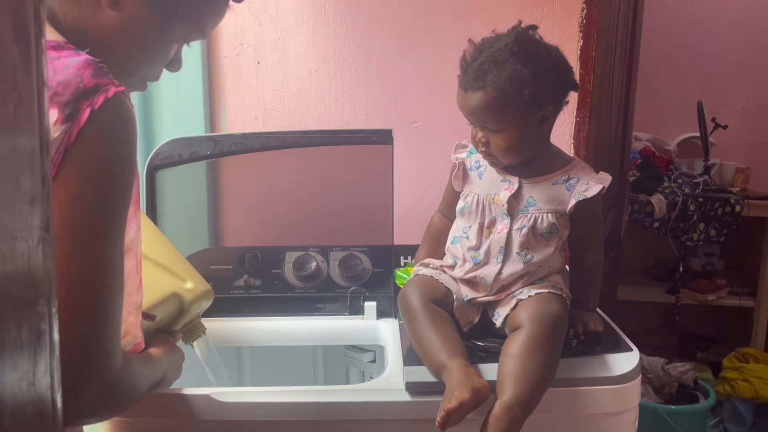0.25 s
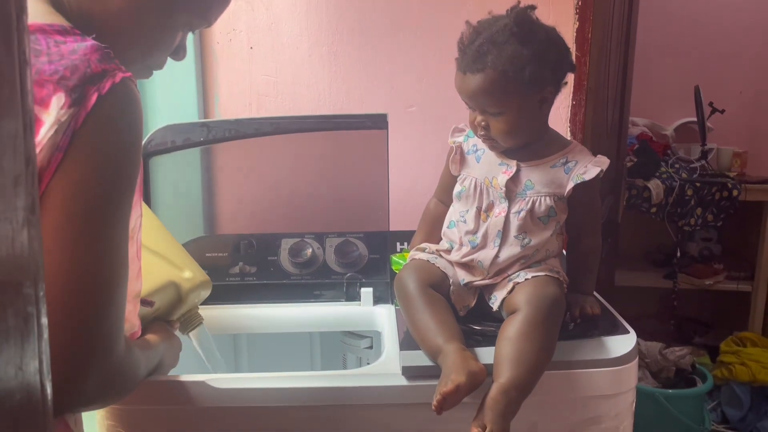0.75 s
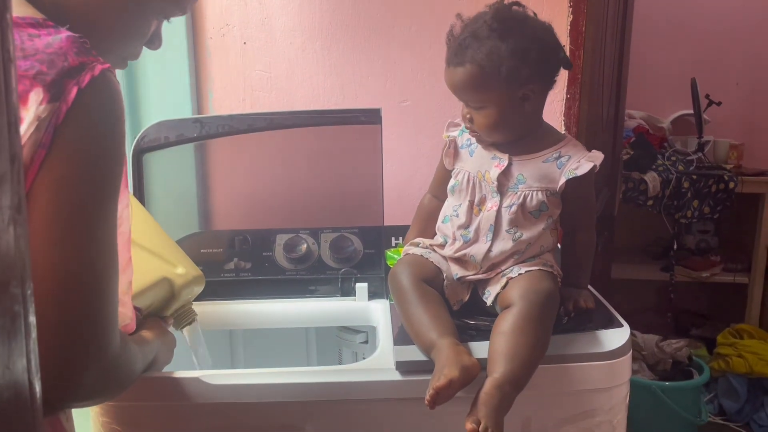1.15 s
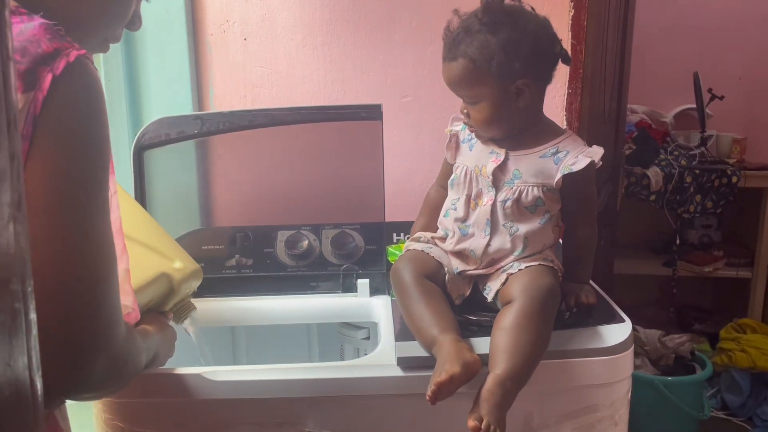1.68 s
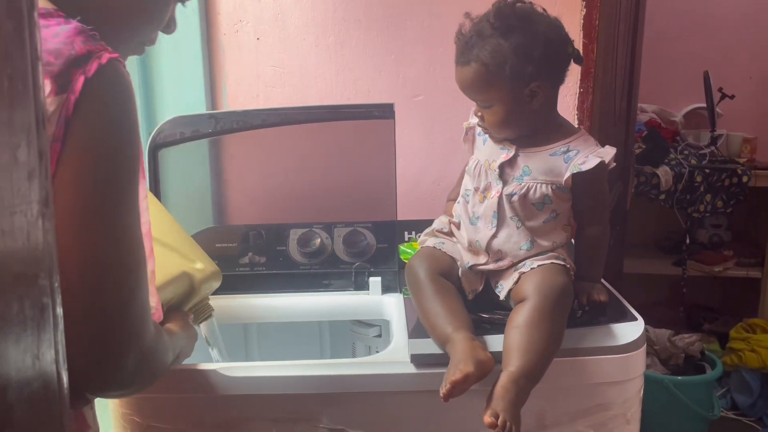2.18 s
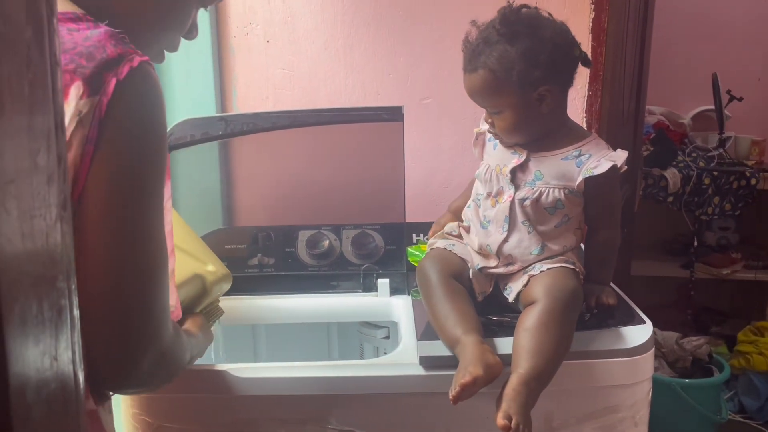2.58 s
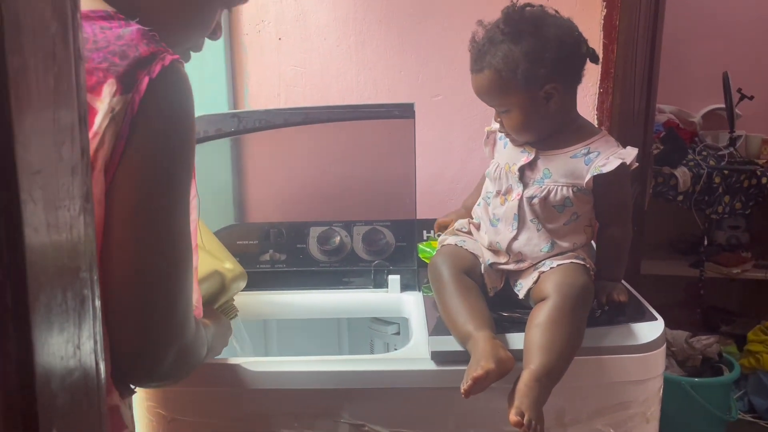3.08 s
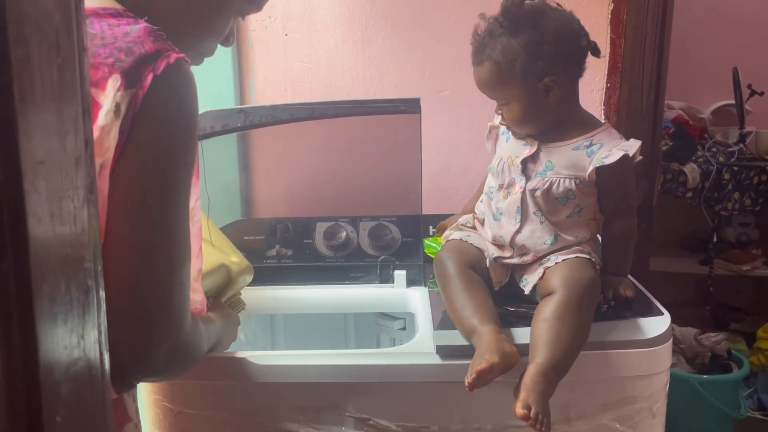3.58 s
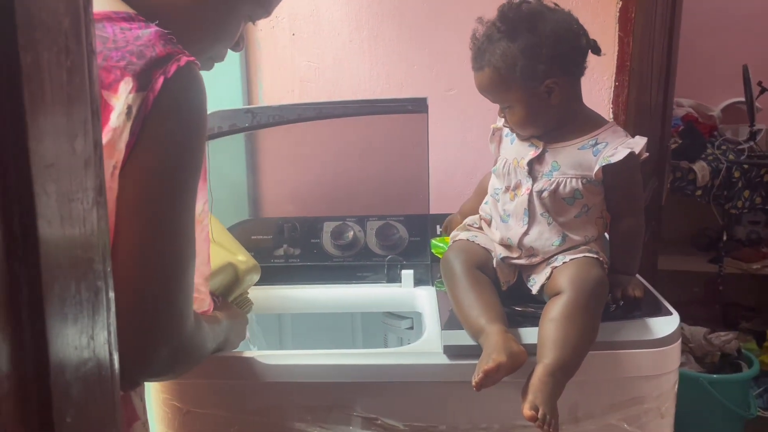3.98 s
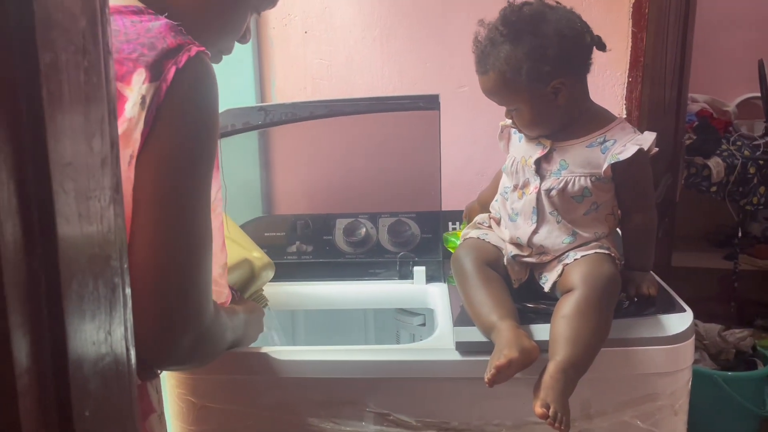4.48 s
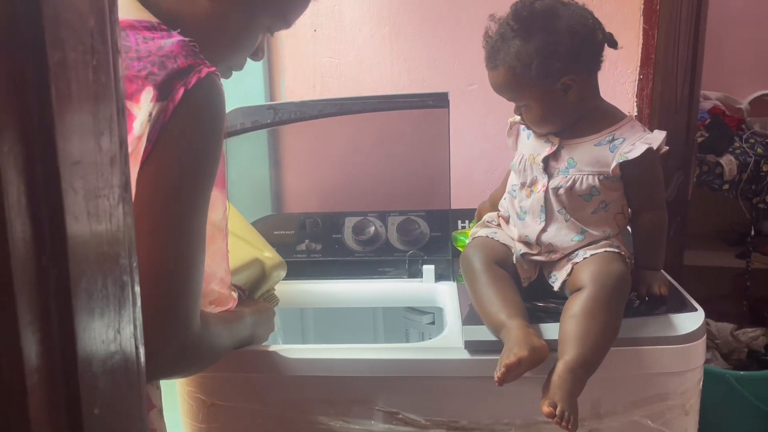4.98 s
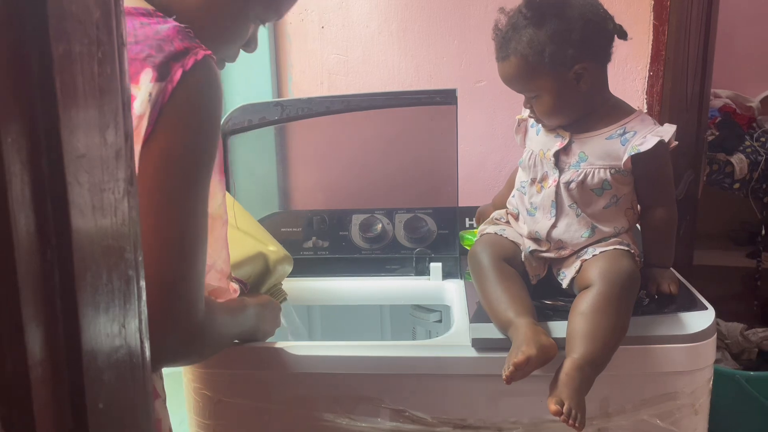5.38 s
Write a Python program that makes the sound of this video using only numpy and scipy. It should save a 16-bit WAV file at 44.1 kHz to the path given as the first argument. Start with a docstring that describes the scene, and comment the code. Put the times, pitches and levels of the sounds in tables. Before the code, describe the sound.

An uneven stream of water falls into a hollow plastic tub, heard from a step away by two close microphone ports. Hissing spray and ringing bubbles ride over low, boomy tub resonance. It begins gurgling, slaps brightly, thumps the wall, then surges and gulps irregularly, with late deep knocks and a final rising splash. The room's tail is short and dense.

```python
"""Small room, a step from a washing machine: water glugs from a plastic can into its deep plastic tub.
Low gurgles open the sound, then bright slaps near 0.4 s; a wall thump follows at 0.6 s, gulps at 1 s.
Surges crowd again at 1.6-1.95 s; a strong gulp knocks at 2.6 s, and from 2.9 s surges come often.
Gulps knock again just after 5 s, a last surge lands at 5.4 s, and the splash swells to the end.
Noise bands make the spray, ringing pockets the bubbles, resonators the tub; two close ports hear it."""
import sys
import numpy as np
from scipy import signal
from scipy.fft import rfft, irfft, next_fast_len
from scipy.io import wavfile
from scipy.ndimage import uniform_filter1d

SR = 44100
rng = np.random.default_rng(int(sys.argv[2]) if len(sys.argv) > 2 else 0)


def transcribe(signal):
    """Save signal, clipped to [-1, 1], as a 16-bit WAV file at the path in sys.argv[1]."""
    frames = np.atleast_2d(signal).T
    limited = np.clip(frames, -1, 1)
    pcm = np.round(limited * 32767).astype(np.int16)
    wavfile.write(sys.argv[1], SR, pcm)


N = 248724

# surges landing on the pool:
# t/s, level/dB, rise/s, t60/s, centre f/Hz, fall either side/(dB per octave)
SURGES = [(0.06, -6, 0.022, 0.68, 1080, 5), (0.19, -10, .02, 0.32, 560, 21),
          (0.269, -13.5, 0.0024, 0.062, 2490, -2.5), (0.3, -1, 0.02, 0.12, 7000, 11),
          (0.385, -6.5, 0.0094, 0.24, 11000, 0.5), (0.42, -4, 0.0043, 0.47, 3050, 9.5),
          (0.435, -4.5, 0.0023, 0.28, 1400, 9), (0.61, -14, 0.011, 1, 6000, 17),
          (0.849, -3.5, 0.0025, 0.22, 3000, 2.5), (0.902, -5, .002, 0.4, 2160, 8),
          (1.597, -6, 0.012, 0.36, 3000, 10), (1.617, -13, .004, 0.22, 2280, 20),
          (1.68, -4.5, 0.041, 0.52, 1220, 8.5), (1.745, -0.5, 0.012, 0.25, 570, 16),
          (1.83, -2.5, .01, 0.21, 800, 17), (1.868, -10.5, .001, 0.21, 4750, 18),
          (1.921, -14, .002, 0.37, 12100, 3), (1.947, -4.5, 0.00085, 0.48, 2520, 2.5),
          (2.12, -12.5, 0.045, 0.87, 4000, 3), (2.609, -3.5, 0.0051, 0.15, 2000, 3.5),
          (2.66, -17, 0.015, 0.83, 2200, 0.5), (2.925, -10, 0.0011, 0.45, 1510, 0),
          (2.94, -8, 0.015, 0.77, 1200, 19), (2.942, -7, .003, 1, 2800, 8),
          (3.135, -15.5, 0.016, 0.51, 2500, 0), (3.288, -8.5, 0.037, 0.25, 2300, -1),
          (3.3, -21, 0.033, .4, 10000, 1), (3.443, -2, 0.0007, 0.06, 11500, 7),
          (3.452, -14, 0.013, 0.54, 8000, 3), (3.455, -12.5, .01, 0.87, 1790, 9),
          (3.673, -1, 0.0007, 0.049, 950, 17), (3.726, -4.5, .001, 0.2, 5200, 6.5),
          (3.795, -6, 0.0055, 0.62, 2600, 3), (3.92, -6, 0.017, 0.31, 3540, 3),
          (4.09, -13, 0.0047, 1, 5970, 5), (4.2, -12, 0.011, 0.1, 2500, 3),
          (4.32, -15, 0.0088, 0.42, 9800, 4), (4.525, -17, 0.013, .4, 6000, -2.5),
          (4.549, -7, .002, 0.67, 2490, 4), (4.88, -4, 0.0027, 0.1, 4520, 11),
          (4.943, -0.5, .001, 0.12, 6160, 14), (5.017, -5.5, 0.0022, 0.12, 1750, 6),
          (5.041, -9, 0.0028, 0.55, 3020, 5), (5.129, -11.5, 0.002, 0.21, 1500, 5.5),
          (5.163, -10, .008, 0.26, 1500, 11), (5.35, -10.5, 0.021, 0.51, 8000, 0),
          (5.405, -2, 0.0068, 0.6, 2510, 16)]


def slaps(hz):
    """Envelope of the surges in one band: each rises as it lands, then its spray settles."""
    out = np.zeros((1, N))
    for s, level_db, rise_s, t60, centre_hz, fall_db in SURGES:
        t = np.arange(round(t60 * SR)) / SR
        band_db = level_db - fall_db * abs(np.log2(hz / centre_hz))
        rise = 1 - np.exp(-t / rise_s)
        add(out, s, amp(band_db - 60 * t / t60) * rise)
    return out[0]


# the stream between surges: t/s, then relative level/dB of gurgle, splash, spray, fine mist
STREAM_LEVELS = [(0.0, -33, -26.5, -27.5, -32), (0.24, -34, -33, -29.5, -30.5),
                 (0.33, -41, -26.5, -26, -31), (0.44, -36.5, -34.5, -31.5, -32.5),
                 (0.83, -26, -25.5, -23, -26.5), (1.05, -28.5, -24.5, -27, -27),
                 (1.24, -30.5, -26, -25.5, -27), (1.33, -38, -28.5, -29.5, -31.5),
                 (1.46, -35, -31, -30.5, -33), (1.58, -31.5, -37, -28, -31), (1.71, -31, -43, -33, -38.5),
                 (1.93, -37.5, -34, -38, -34), (2.12, -26.5, -29, -26.5, -26.5),
                 (2.5, -35.5, -30, -31, -31.5), (2.78, -29, -39, -34, -40.5), (2.97, -33, -44, -35.5, -35),
                 (3.12, -27, -30.5, -30.5, -32.5), (3.36, -32, -29, -29, -32), (3.53, -32, -35, -35, -41),
                 (3.75, -28, -39, -32.5, -31.5), (4.0, -33, -30, -30, -30.5),
                 (4.19, -30, -25, -29.5, -32.5), (4.3, -31.5, -33.5, -35.5, -35),
                 (4.42, -32, -32, -33, -37), (4.51, -34, -39, -36, -37), (4.59, -32, -22, -23, -29),
                 (4.74, -32, -31, -29, -32), (4.98, -33.5, -26.5, -26, -30.5),
                 (5.17, -30.5, -47, -37.5, -32.5), (5.3, -38.5, -34, -34, -34.5),
                 (5.42, -30.5, -26, -18, -26), (5.55, -25, -23, -24, -29), (5.64, -24, -15.5, -25, -25.5)]
HOLD_S = 0.0057  # the stream's level may not rise just before a surge lands


def stream_between_surges():
    """Register levels of the stream; they may not rise just before a surge, so that it starts abruptly."""
    out = np.array(in_time(STREAM_LEVELS))
    for s, *_ in SURGES:
        hold = slice(round((s - HOLD_S) * SR), round(s * SR))
        out[:, hold] = np.minimum.accumulate(out[:, hold], axis=1)
    return out


# spectrum of the water noise: f/Hz, relative level/dB
WATER_SPECTRUM = [(420, -2), (600, -8), (800, 0), (1500, -1.5), (2000, -2.5), (2800, -1.5), (4500, -5),
                  (7000, -3.5), (9000, -6.5), (11500, -3), (14000, -9), (16000, -17.5)]
# registers gurgle, splash, spray, mist, one a row: low f/Hz, high f/Hz
WATER_REGISTERS = [(480, 1400), (1400, 4000), (4000, 7500), (9800, 15700)]


def spray(register_db, patchy_db):
    """Droplet hiss in third-octave noise bands; each band follows the registers next to it."""
    edges = 420 * 2 ** np.arange(0, 5.4, 1 / 3)
    centres = np.sqrt(edges[1:] * edges[:-1])
    log_middles = np.log(np.prod(WATER_REGISTERS, axis=1)) / 2
    # level of each register relative to its share of the water spectrum
    power = [np.sum(amp(2 * at_hz(WATER_SPECTRUM, np.arange(low, high)))) * 2 / SR
             for low, high in WATER_REGISTERS]
    lift_db = np.array(register_db) - 10 * np.log10(power)[:, None]
    white = rng.standard_normal((2, 2, N))  # neighbouring bands take turns at two noises
    together = drift(3.0)
    patches = [drift(21.4) for _ in range(6)]  # one for every three bands
    out = 0
    for k, hz in enumerate(centres):
        band = signal.butter(2, edges[k:k + 2], "band", fs=SR, output="sos")
        weights = [np.interp(np.log(hz), log_middles, row) for row in np.eye(len(log_middles))]
        level = np.hypot(amp(weights @ lift_db), slaps(hz))
        patch_db = patchy_db * (together / 5 + patches[k // 3])
        gain = amp(at_hz(WATER_SPECTRUM, hz) + patch_db) * level
        out = out + gain * signal.sosfilt(band, white[k % 2])
    return out


def bubbles(register_db, surge_db, per_s, cycles, spread_db):
    """Small bubbles born at random ring for tens of cycles, louder in surges, each in its own direction."""
    sizes = amp(spread_db * np.minimum(rng.exponential(1, N), 3)) * rng.standard_normal((2, N))
    born = rng.random(N) < per_s / SR
    dealt = rng.integers(0, 36, N)  # which of 36 pitches each bubble takes
    pitches = np.geomspace(600, 6000, 36) * amp(rng.normal(0, 0.19, 36))
    register_tops = [high for low, high in WATER_REGISTERS]
    out = 0
    for k, hz in enumerate(pitches):
        clicks = sizes * (born & (dealt == k)) + 1e-18
        softened = resonance(clicks, hz, 8.8 * hz / cycles)
        rings = resonance(softened, hz, 2.0 * hz / cycles)
        stream_db = register_db[np.searchsorted(register_tops, hz)]
        level = np.hypot(amp(stream_db), amp(surge_db) * slaps(hz))
        out = out + level * rms_one(rings)
    return out / np.sqrt(12)


# cross modes of the tub: f/Hz, width/Hz, level/dB in the first view, level/dB in the second
CROSS_MODES = [(480, 58, -38, -22), (774, 32, -9, -5), (964, 31, -5, -22), (1240, 77, -7.5, -1),
               (1410, 71, -18, 6), (1850, 49, -3, 11), (2000, 165, -6, -15), (2220, 31, 0, -26),
               (2800, 110, -10, 9.5), (3600, 330, -12, -3), (5114, 67, -4, -15)]


def tub_colour(x):
    """The splash plus its ringing in the cross modes of the tub."""
    out = x
    for hz, width_hz, *levels_db in CROSS_MODES:
        out = out + amp(levels_db)[:, None] * resonance(x, hz, width_hz)
    return out


# single loud bubbles: t/s, level/dB, f/Hz at the start, t60/s
LOUD_BUBBLES = [(0.066, -19, 1900, 0.046), (0.068, -28, 930, 0.046), (0.09, -21, 1780, 0.054),
                (0.118, -20, 2220, 0.14), (0.146, -17.5, 1020, 0.19), (0.196, -19, 942, 0.041),
                (0.197, -22, 670, 0.045), (0.222, -24, 880, 0.045), (0.243, -27, 620, 0.04),
                (0.262, -26, 542, 0.12), (0.272, -25, 1920, 0.05), (0.379, -18, 1900, 0.042),
                (0.419, -15, 3710, 0.083), (0.42, -17, 3930, 0.043), (0.424, -17, 2430, 0.09),
                (0.424, -14, 2800, 0.045), (0.433, -7.5, 2000, 0.033), (0.435, -19, 3220, 0.034),
                (0.442, -13, 1990, 0.074), (0.448, -19, 1510, 0.028), (0.456, -19, 1240, 0.046),
                (0.52, -22, 2080, 0.034), (0.612, -22, 803, 0.045), (0.731, -17.5, 1250, 0.04),
                (0.816, -21, 2100, 0.069), (0.85, -19, 2380, 0.13), (0.854, -16, 750, 0.13),
                (0.855, -16, 2000, 0.17), (0.902, -5.5, 2160, 0.024), (0.931, -14, 750, 0.034),
                (1.029, -19, 1320, 0.044), (1.26, -23, 2100, 0.063), (1.442, -19.5, 2330, 0.043),
                (1.605, -22, 2990, 0.063), (1.619, -17, 2250, 0.082), (1.678, -24, 1490, 0.04),
                (1.696, -26, 1530, 0.054), (1.702, -28.5, 2740, 0.046), (1.712, -26, 2800, 0.035),
                (1.714, -22, 1300, 0.03), (1.736, -26, 1280, 0.04), (1.741, -18.5, 963, 0.05),
                (1.78, -30, 780, 0.033), (1.789, -25, 547, 0.041), (1.839, -28, 830, 0.025),
                (1.849, -27, 1180, 0.04), (1.947, -15, 2060, 0.028), (1.951, -17, 3830, 0.04),
                (1.952, -16, 1246, 0.088), (1.954, -26, 2150, 0.098), (1.976, -20, 2240, 0.046),
                (2.181, -22, 1880, 0.067), (2.292, -23, 3330, 0.029), (2.51, -21, 2220, 0.041),
                (2.617, -14.5, 750, 0.061), (2.616, -21, 3570, 0.057), (2.668, -23, 2180, 0.058),
                (2.791, -29, 713, 0.085), (2.926, -15, 840, 0.023), (2.938, -16.5, 1060, 0.05),
                (2.941, -13, 2530, 0.045), (2.943, -13, 3200, 0.03), (2.944, -23, 2320, 0.1),
                (2.948, -19, 2850, 0.069), (2.974, -14, 1900, 0.04), (2.984, -14, 1800, 0.05),
                (2.991, -14, 1850, 0.032), (2.997, -15, 1425, 0.06), (3.008, -19, 1890, 0.051),
                (3.227, -23, 907, 0.14), (3.32, -27, 2320, 0.065), (3.341, -21, 2310, 0.1),
                (3.38, -20, 2300, 0.057), (3.46, -24, 3020, 0.064), (3.474, -23, 1060, 0.092),
                (3.475, -20, 2000, 0.03), (3.543, -21, 1330, 0.043), (3.556, -21, 1760, 0.036),
                (3.628, -24, 750, 0.069), (3.674, -21, 910, 0.019), (3.731, -24, 2050, 0.031),
                (3.789, -17, 1890, 0.064), (3.809, -10.5, 2000, 0.069), (3.813, -22, 2800, 0.03),
                (3.815, -19, 3600, 0.024), (3.824, -16, 1740, 0.11), (3.859, -24, 950, 0.09),
                (3.934, -16, 1235, 0.04), (3.942, -20, 1380, 0.03), (3.946, -19, 2050, 0.03),
                (3.96, -15, 2290, 0.048), (4.022, -30, 1200, 0.045), (4.076, -28, 812, 0.16),
                (4.097, -20.5, 3010, 0.032), (4.155, -22, 768, 0.19), (4.202, -23, 3470, 0.034),
                (4.227, -19, 2800, 0.038), (4.298, -29, 1260, 0.034), (4.321, -25, 1090, 0.033),
                (4.361, -23, 2000, 0.044), (4.494, -27, 990, 0.04), (4.551, -12.5, 2010, 0.06),
                (4.553, -18, 1784, 0.069), (4.556, -20, 950, 0.04), (4.575, -21, 1090, 0.035),
                (4.559, -20, 3420, 0.034), (4.571, -14, 2620, 0.053), (4.577, -18, 2200, 0.09),
                (4.619, -20, 2620, 0.1), (4.622, -16, 2300, 0.057), (4.73, -19, 1940, 0.031),
                (4.791, -23, 3520, 0.025), (4.834, -25, 1930, 0.063), (4.906, -10.5, 2090, 0.052),
                (4.93, -27, 2160, 0.078), (5.018, -16, 1600, 0.04), (5.019, -14, 1860, 0.038),
                (5.046, -20, 750, 0.075), (5.054, -26, 2670, 0.057), (5.129, -16, 890, 0.029),
                (5.129, -17.5, 1740, 0.04), (5.145, -27, 1800, 0.04), (5.168, -19, 950, 0.03),
                (5.177, -24, 1100, 0.04), (5.174, -19, 1690, 0.038), (5.185, -27, 1210, 0.04),
                (5.224, -23, 1050, 0.075), (5.406, -18, 2380, 0.084), (5.414, -18, 2290, 0.097),
                (5.418, -10, 1330, 0.022), (5.42, -14, 1815, 0.088)]
# lesser bubbles at random: mean rate, top level and range below it, lowest and highest pitch, decay
LESSER_PER_S, LESSER_DB, LESSER_RANGE_DB = 20, -31.5, 7.5
LESSER_LOW_HZ, LESSER_HIGH_HZ, LESSER_T60_S = 750, 3570, 0.042
# a partner of each loud bubble: longest wait, level against it, widest share of pitch apart
PARTNER_S, PARTNER_DB, PARTNER_APART = 0.012, -8, 0.16


def plops():
    """Trapped air rings: loud bubbles, a partner shed by each, and a random scatter of lesser ones."""
    wait, size, pitch = rng.random((200, 3)).T
    lesser_s = np.cumsum(-np.log(wait)) / LESSER_PER_S
    lesser_db = LESSER_DB - LESSER_RANGE_DB * size
    lesser_hz = LESSER_LOW_HZ * (LESSER_HIGH_HZ / LESSER_LOW_HZ) ** pitch
    lesser = zip(lesser_s, lesser_db, lesser_hz, np.full(len(wait), LESSER_T60_S))
    late, apart = rng.random((len(LOUD_BUBBLES), 2)).T
    partners = [(s + PARTNER_S * a, level_db + PARTNER_DB, hz * (1 + PARTNER_APART * (2 * b - 1)), t60)
                for (s, level_db, hz, t60), a, b in zip(LOUD_BUBBLES, late, apart)]
    events = [row for row in [*LOUD_BUBBLES, *partners, *lesser] if row[0] < N / SR]
    return rung(events, rise=0.036, attack_s=0.00097, wobble=0.043)


# air gulped under the surface: t/s, level/dB, f/Hz at the start, t60/s (held within 0.01-0.5 s)
AIR_GULPS = [(0.075, -16.5, 331, 0.1), (0.88, -18.5, 358, 0.22), (1.001, -25, 281, 0.18),
             (1.024, -9, 298, 0.027), (1.098, -9.5, 320, 0.04), (1.591, -16.5, 337, 0.39),
             (2.09, -16.5, 392, 0.25), (2.263, -22, 361, 0.092), (2.618, -4, 321, 0.065),
             (2.932, -14.5, 346, 0.067), (3.14, -11, 304, 0.18), (3.19, -14, 340, 0.11),
             (3.242, -10, 317, 0.064), (3.456, -14, 313, 0.31), (3.809, -18, 318, 0.027),
             (3.74, -17, 320, 0.11), (4.215, -17, 327, 0.1), (4.33, -21, 326, 0.049),
             (4.439, -12, 317, 0.0094), (4.739, -16, 305.6, 0.19), (5.049, -5, 310, 0.1),
             (5.097, -9, 331, 0.089), (5.177, -19, 340, .06), (5.456, -18, 346, 0.073)]


def gulps():
    """Air gulped under the surface knocks the air space of the tub."""
    return rung(AIR_GULPS, rise=0.028, attack_s=0.0032, wobble=0.058)


# lumps of water on the walls: t/s, level/dB, f/Hz at the start, t60/s (held within 0.01-0.5 s)
WALL_THUMPS = [(0.416, -17, 150, 0.17), (0.581, -7.5, 105, 0.2), (0.63, -10.5, 114.8, 0.3),
               (0.806, -13.5, 110, 0.17), (1.58, -16.5, 109.8, 0.52), (1.979, -15.5, 117.3, 0.56),
               (2.619, -15, 96.5, 0.2), (2.746, -28, 62, 0.22), (3.031, -15, 113, 0.045),
               (3.301, -17, 127.4, 0.38), (3.474, -15, 118, 0.33), (3.662, -14.5, 96.8, 0.27),
               (3.88, -15.5, 104, 0.63), (4.241, -26, 109, 0.15), (4.522, -14.5, 156.5, 0.38),
               (4.6, -16, 65.5, 0.41), (5.06, -23, 95, 0.36), (5.409, -13, 115, 0.14)]


def thumps():
    """Lumps of water thump the tub walls, which ring low."""
    return rung(WALL_THUMPS, rise=0.029, attack_s=0.007, wobble=0.0083)


def drumming(modes, level_db, lumpy_db, lumps_per_s, steady):
    """Churning water shakes a set of tub resonances; a steady push evens out their swing."""
    out = 0
    for hz, width_hz, mode_db in modes:
        churn = rng.standard_normal((2, N))
        once = resonance(churn, hz, 1.3 * width_hz)
        rings = rms_one(resonance(once, hz, 1.3 * width_hz))
        swing = np.sqrt(uniform_filter1d(rings ** 2, round(SR / hz)) + 0.073)
        lumps = amp(mode_db + lumpy_db * drift(lumps_per_s))
        out = out + lumps * rms_one(rings / swing ** steady)
    return amp(level_db) * rms_one(out)


def stirred(level_db, events, after_db, t60):
    """A shaking level raised after each blow, as churned water goes on shaking the tub and dies away."""
    out = np.zeros((1, N))
    t = np.arange(round(t60 * SR)) / SR
    for s, blow_db, *_ in events:
        add(out, s, amp(blow_db + after_db - 60 * t / t60))
    return 20 * np.log10(np.hypot(amp(level_db), out[0]))


# how hard the water shakes the tub, blows aside: t/s, then level/dB of air space, walls, deepest sway
TUB_SHAKE = [(0.0, -35, -26, -25), (0.09, -26.5, -21, -45), (0.3, -31.5, -23, -29), (0.56, -32, -26.5, -37),
             (0.6, -29, -36, -16), (0.71, -32.5, -22.5, -28), (1.15, -27, -24.5, -41),
             (1.29, -39.5, -30, -45), (1.59, -27, -24, -35), (2.03, -31.5, -22, -26),
             (2.12, -22, -24.5, -40), (2.56, -31.5, -30, -37), (2.62, -22, -25, -35),
             (2.76, -36.5, -26, -21.5), (3.12, -26, -28.5, -44), (3.17, -16.5, -22.5, -43),
             (3.28, -29.5, -27.5, -37), (3.9, -25.5, -21.5, -30.5), (3.96, -27.5, -29, -41),
             (4.18, -39, -28.5, -25), (4.23, -26, -21, -30), (4.38, -29.5, -24, -43),
             (4.49, -29, -27.5, -26), (4.54, -26.5, -20, -39), (4.74, -21, -26.5, -28),
             (5.01, -43, -30.5, -36), (5.06, -22, -24, -34), (5.09, -22, -15.5, -36),
             (5.25, -31.5, -22.5, -32), (5.64, -27.5, -23, -40)]
# resonances of the air space: f/Hz, width/Hz before the 1.3 in drumming, relative level/dB
AIR_SPACE = [(286, 72, -2.5), (322.7, 37.4, -1.5), (360.5, 33, -6), (392, 90, -5)]
# boom of the walls: same columns
WALL_BOOM = [(101.8, 23.4, 0), (113.4, 15.6, -4), (150, 19.5, -5.5), (195, 17.3, -7.5)]
# deepest sway of the tub: same columns
DEEP_SWAY = [(58.5, 8.2, -3), (68.2, 13, -4)]


def shaken_tub():
    """The air space rings, the walls boom and the whole tub sways under the churning water."""
    air_db, wall_db, sway_db = in_time(TUB_SHAKE)
    air_db = stirred(air_db, AIR_GULPS, after_db=-21.5, t60=1)
    wall_db = stirred(wall_db, WALL_THUMPS, after_db=-12.5, t60=0.56)
    air = drumming(AIR_SPACE, air_db, lumpy_db=2.5, lumps_per_s=50, steady=0.07)
    walls = drumming(WALL_BOOM, wall_db, lumpy_db=2.0, lumps_per_s=60, steady=0.34)
    sway = drumming(DEEP_SWAY, sway_db, lumpy_db=-0.5, lumps_per_s=9.9, steady=0.64)
    return air + walls + sway


ROOM_T60_S, ROOM_DB, WANDER_PER_S = 0.24, -8.5, 1.45


def room(x):
    """Tub walls and room return a short dense tail, which changes as the stream wanders over the pool."""
    t = np.arange(round(ROOM_T60_S * SR)) / SR
    tails = rng.standard_normal((4, 2, len(t))) * amp(-60 * t / ROOM_T60_S) * (t > .002)
    tails *= amp(ROOM_DB) / np.sqrt(np.sum(tails ** 2, axis=2, keepdims=True))
    places = np.array([drift(WANDER_PER_S) for _ in tails])
    places /= np.sqrt(np.sum(places ** 2, axis=0))  # total power stays even
    out = x
    for place, tail in zip(places, tails):
        out = out + signal.oaconvolve(place * x, tail, axes=1)[:, :N]
    return out


def chirp(hz, t60, rise, attack_s, wobble):
    """A ringing air pocket: pitch climbs by the share rise over one t60 and wavers as its shape shakes."""
    t = np.arange(round(t60 * SR)) / SR
    waver = np.interp(t, np.linspace(0, .5, 126), rng.standard_normal(126))
    turns = np.cumsum(hz * (1 + rise * t / t60 + wobble * waver)) / SR
    swell = (1 - np.exp(-t / attack_s)) * amp(-60 * t / t60)
    swell = swell / swell.max()
    return swell * np.array([np.sin(2 * np.pi * turns), np.cos(2 * np.pi * turns)])


def rung(events, rise, attack_s, wobble):
    """Play a table of ringing events, a quarter turn apart in the two views."""
    out = np.zeros((2, N))
    for s, level_db, hz, t60 in events:
        add(out, s, amp(level_db) * chirp(hz, np.clip(t60, .01, .5), rise, attack_s, wobble))
    return out


def resonance(x, hz, width_hz):
    """Two-pole band-pass with gain about 1 on top."""
    r = np.exp(-np.pi * width_hz / SR)
    top = np.array([1, 0, -1]) * (1 - r * r) / 2
    return signal.lfilter(top, [1, -2 * r * np.cos(2 * np.pi * hz / SR), r * r], x)


def drift(rate):
    """Slow chance with rms 1: noise through two equal low-pass poles at rate/Hz."""
    r = np.exp(-40 * np.pi * rate / SR)  # computed at every 20th sample
    slow = signal.lfilter([1], [1, -2 * r, r * r], rng.standard_normal(N // 20 + 3002))[3000:]
    return np.interp(np.arange(N) / 20, np.arange(len(slow)), rms_one(slow))


def add(out, s, shape):
    """Mix a sound or envelope in at time s."""
    i = round(s * SR)
    out[:, i:i + shape.shape[-1]] += shape[..., :N - i]


def in_time(rows):
    """Columns of a curve table, one value a sample."""
    s, *columns = np.transpose(rows)
    return [np.interp(np.arange(N) / SR, s, c) for c in columns]


def at_hz(points, hz):
    """Read a spectrum on a log-frequency axis."""
    table_hz, values = np.array(points).T
    return np.interp(np.log(hz), np.log(table_hz), values)


def amp(db):
    """Decibels to gain."""
    return 10 ** (np.asarray(db) / 20)


def rms_one(x):
    """Scale to unit rms."""
    return x / np.sqrt(np.mean(x ** 2) + 1e-20)


def scene():
    """Two views of the same water, which the ports mix."""
    register_db = stream_between_surges()
    water = amp(-2.5) * spray(register_db, patchy_db=1.5)
    water += amp(-9.0) * bubbles(register_db, surge_db=-15.5, per_s=400, cycles=44.5, spread_db=3.5)
    tub = shaken_tub() + gulps() + thumps()
    return room(tub_colour(water) + plops()) + tub


# port difference against the first view: f/Hz, level/dB
PORT_SPREAD = [(60, -16), (92, -25), (140, -19.5), (210, -8.5), (330, -11), (500, 3.5), (1200, -5.5),
               (2700, -6), (4200, -3.5), (6400, -1.5), (9000, 6), (10800, 4), (11600, -6), (12200, -122)]
# lean of the image, left minus right: f/Hz, level/dB (the tip it asks for is limited)
PORT_LEAN = [(60, 0.5), (120, 0.5), (240, -4), (400, -3), (560, 3.5), (950, 1.5), (1890, 0.5), (3770, 2.0),
             (7520, 0.5), (15000, 0.0)]
# gain of the centre sound, almost nothing from 8.4 to 9.3 kHz: f/Hz, level/dB
CENTRE_GAIN = [(7400, -0.5), (7700, -9.5), (8200, -12), (8400, -115.5), (9300, -37), (9700, 0.5),
               (10000, 3)]
# left port ahead where positive: f/Hz, share of the difference a quarter turn ahead (held within 0.55)
PORT_LEAD = [(600, -0.27), (1500, 0.12), (5000, 0.58), (6000, -0.86)]
CUTOFF_HZ = 15800


def record(dry):
    """Centre sound and port difference become left and right; peaks are rounded and the top is cut."""
    size = next_fast_len(N + 4096)
    hz = np.maximum(np.arange(size // 2 + 1) * SR / size, 10)
    one, other = rfft(dry, size)
    spread = amp(at_hz(PORT_SPREAD, hz))
    power_ratio = amp(2 * at_hz(PORT_LEAN, hz))
    # the share of the first view within the difference tips the image to one side
    tip = (power_ratio - 1) / (power_ratio + 1) * (1 + spread ** 2) / (2 * spread)
    lead = np.clip(at_hz(PORT_LEAD, hz), -.55, .55)
    shared = np.clip(tip, -.8, .8) + 1j * lead
    side = spread * (shared * one + np.sqrt(1 - abs(shared) ** 2) * other)
    centre = amp(at_hz(CENTRE_GAIN, hz)) * one
    pair = irfft([centre + side, centre - side], size)[:, :N]
    rounded = 1.1 * np.tanh(pair / 1.1)
    low_pass = signal.ellip(12, .5, 70, CUTOFF_HZ, fs=SR, output="sos")
    return signal.sosfilt(low_pass, rounded)


dry = scene()
out = record(dry)
transcribe(out)
```